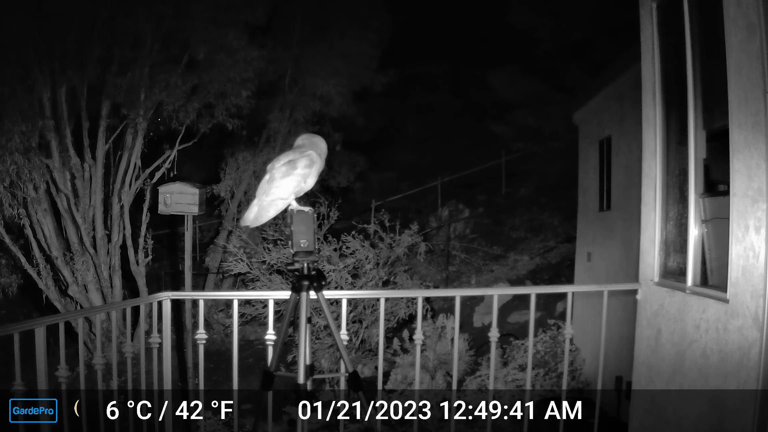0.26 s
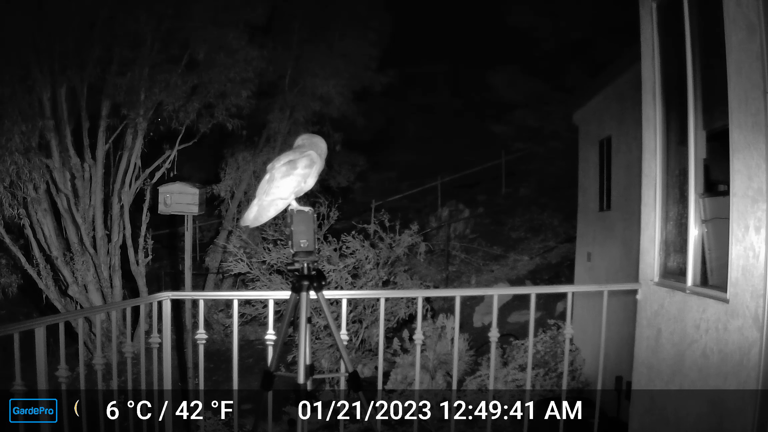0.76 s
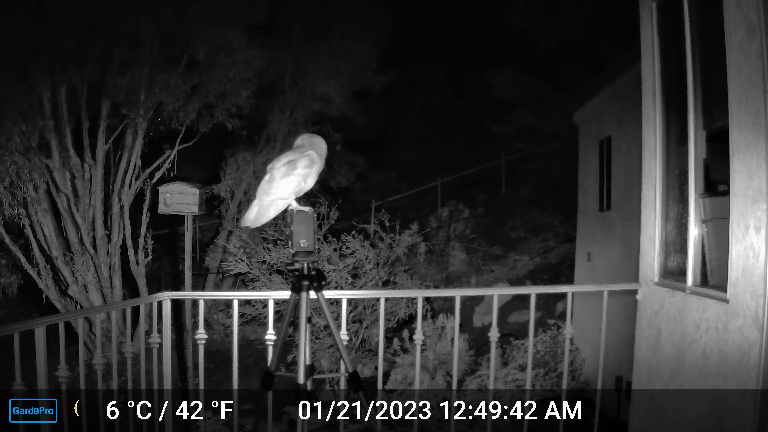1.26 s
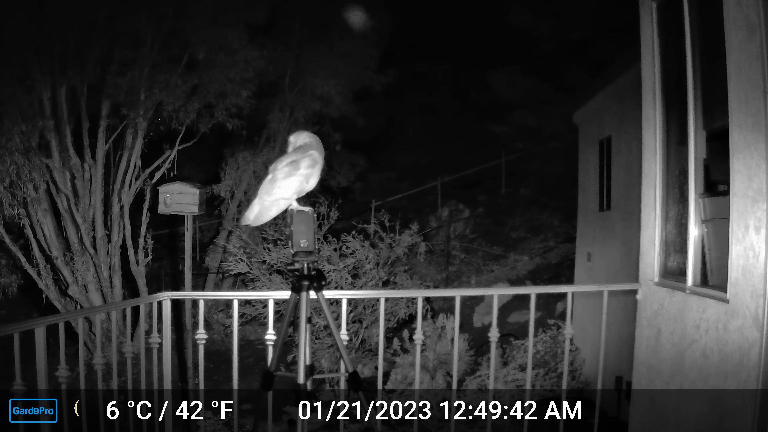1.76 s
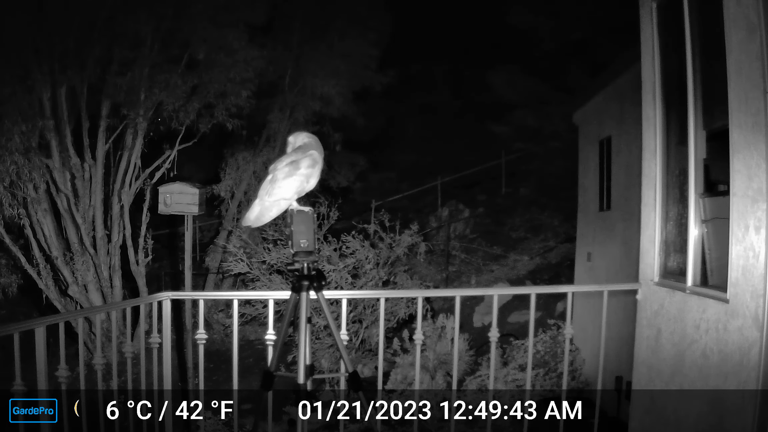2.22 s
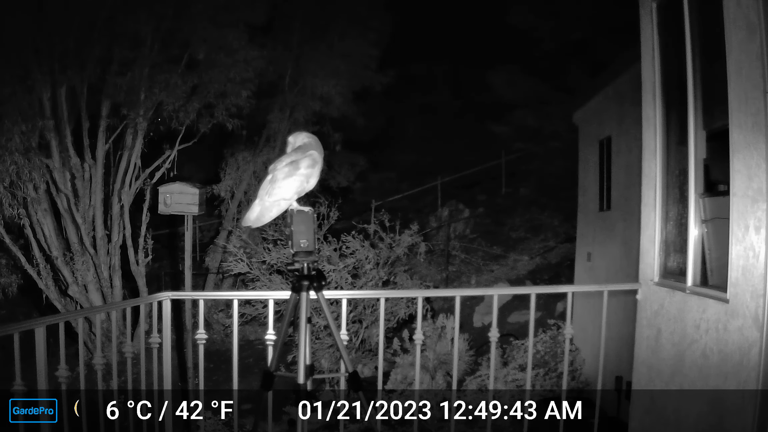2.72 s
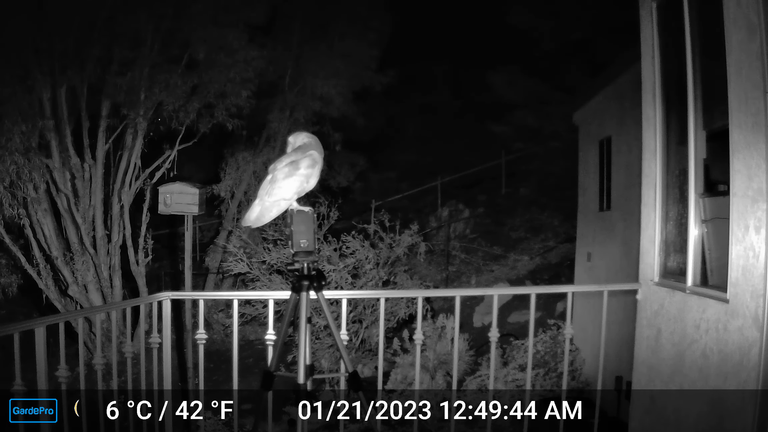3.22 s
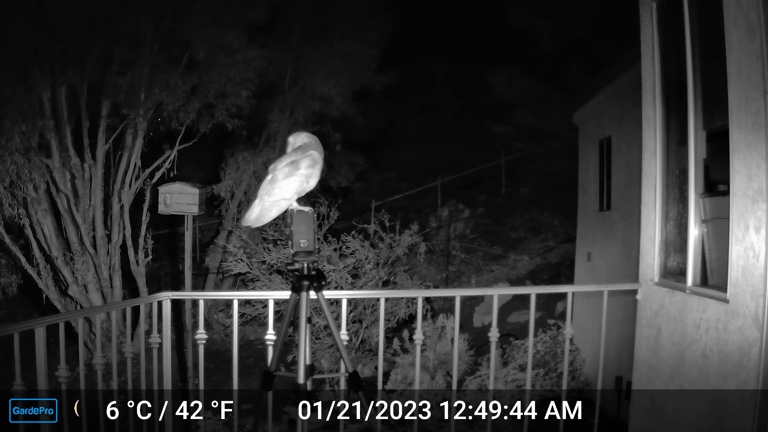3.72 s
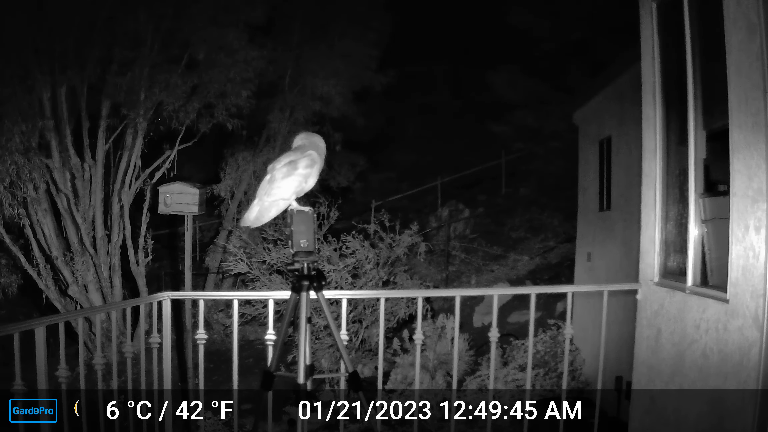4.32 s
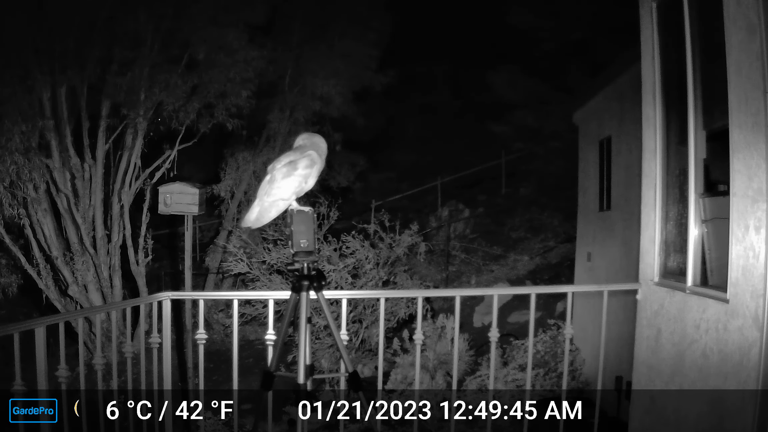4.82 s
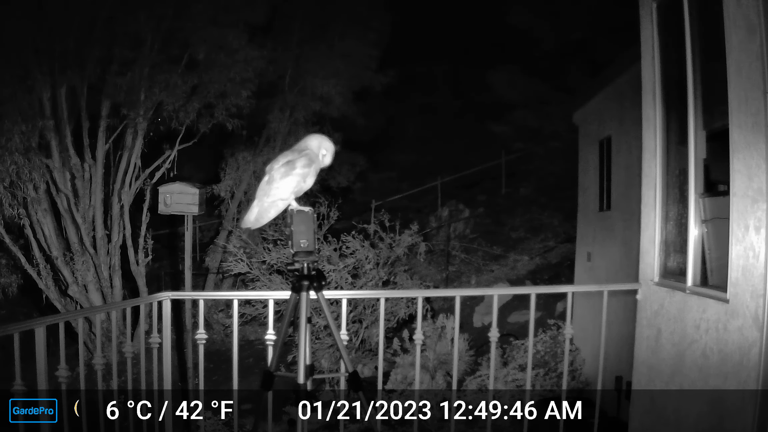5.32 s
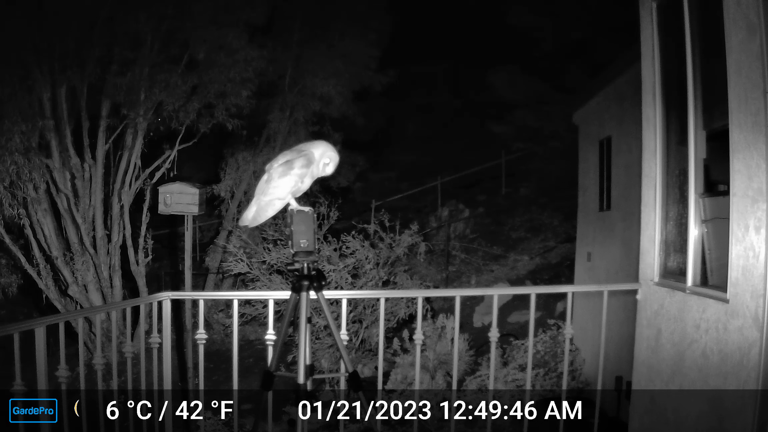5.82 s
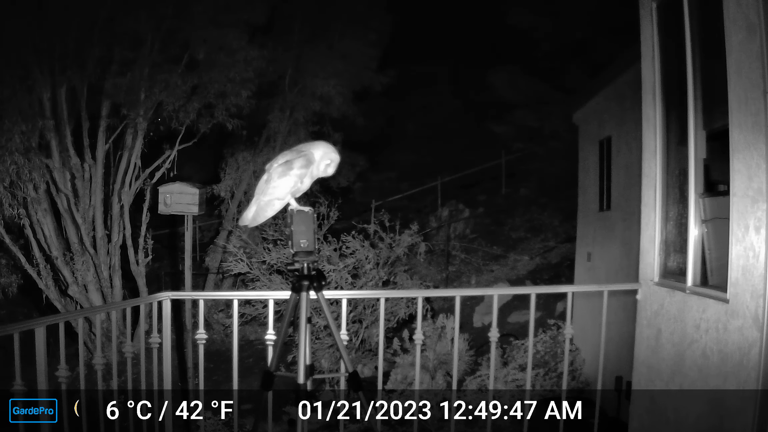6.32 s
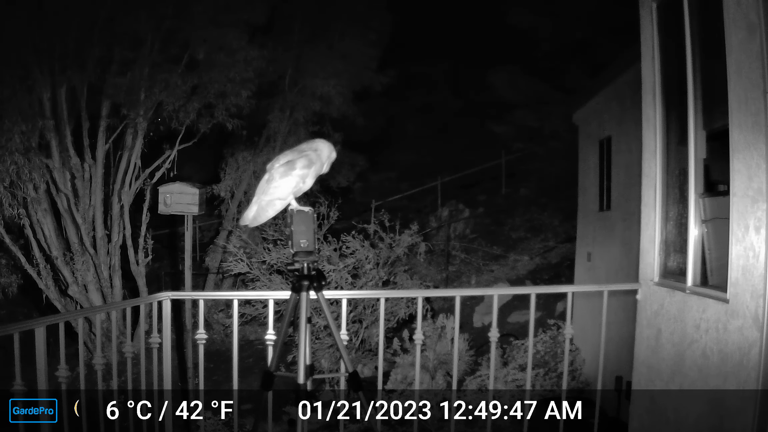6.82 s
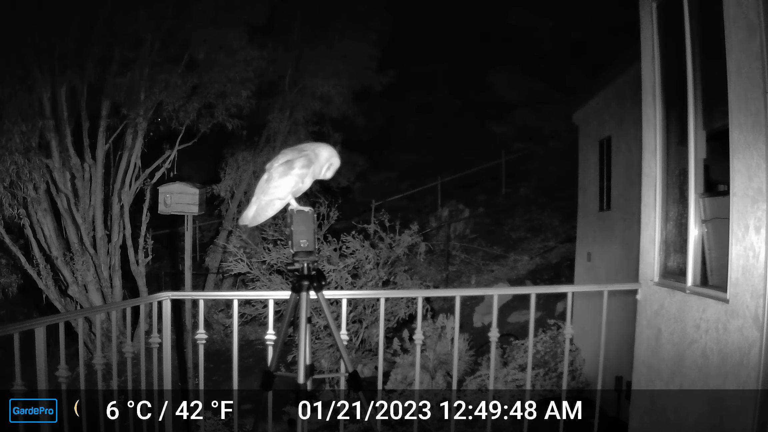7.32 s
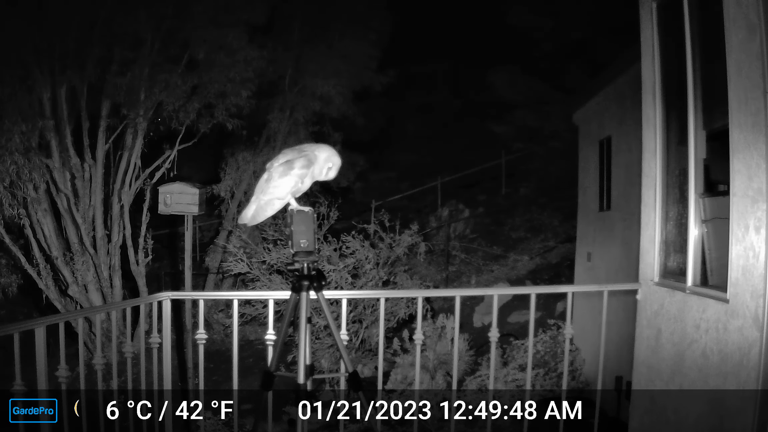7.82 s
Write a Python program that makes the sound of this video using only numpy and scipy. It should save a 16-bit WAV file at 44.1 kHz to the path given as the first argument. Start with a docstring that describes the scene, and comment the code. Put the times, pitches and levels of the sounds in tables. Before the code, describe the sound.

Quiet night air with a steady, far, low rumble. A tiny high pip and soft thump open the scene, with more dull thumps before 0.8 s. A nearby barn owl screeches at 0.4, 1.5, 2.4, 4.2, 5.3 and 6.5 s. Each lasts about 0.45 s: a throaty, fluttering rough tone scoops up, strengthens and opens into coarse hiss, then is sharply cut off. Small falling squeaks end the calls near 1.9, 2.8 and 7.0 s. Other pips come at 1.1 and 4.9 s. Very faint distant hoots sound around 1.8 to 2.3 s, with thumps near 1.9, 3.6, 3.9 and 7.4 s. Distant traffic drone swells after 4 s, strongest around 5.3 and 7.2 s, then fades. Light house reflections and a short tail surround the owl; the small outdoor microphone lacks the highest treble.

```python
"""Barn owl screeching at night

A barn owl by a house gives six rasping screeches: a rough tone and throat sound open into a hiss and are cut off.
One fluttering airflow drives a chaotic tone, throat resonances and beak turbulence; some calls end in gliding squeaks.
Three tiny pips and faint distant hoots are short sine glides. Reflections and a short tail surround owl and pips.
Behind lie a far rumble and traffic drone of resonant noise, and soft thumps that are low, falling glides.
A trail camera close by cuts off the top of the treble."""
import sys
import numpy as np
from scipy import signal
from scipy.fft import rfft, irfft
from scipy.io import wavfile
from scipy.ndimage import uniform_filter1d

SR = 44100
rng = np.random.default_rng(int(sys.argv[2]) if len(sys.argv) > 2 else 0)


def wrap_up_sound(samples):
    """Save the sound to the file named by the first command line argument, as 16-bit audio."""
    columns = np.atleast_2d(samples).T
    # keep every value between -1 and 1, then stretch to whole-number steps
    tamed = np.clip(columns, -1, 1)
    steps = np.round(tamed * 32767).astype(np.int16)
    wavfile.write(sys.argv[1], SR, steps)


N = 355446
TIME = np.arange(N) / SR
FREQS = np.maximum(np.fft.rfftfreq(N, 1 / SR), 1)

# the effort grows steadily through a screech and lifts the pitch and the levels of tone and throat
PITCH_RISE_HZ, TONE_SWELL_DB, THROAT_SWELL_DB = 169.7, 6.5, 2.5
# the hiss lies this far below its full level after its wait, and the gap then decays with this time constant
HISS_RISE_DB, HISS_RISE_S = 25, 0.073
# at the end the breath is cut: level and pitch fall ever faster, by these amounts at the nominal end
RELEASE_S, RELEASE_DB, PITCH_SAG_HZ = 0.056, 23, 140.8
# unsteadiness of the voice: corner rate and rms spreads
WAVER_HZ, PITCH_WAVER_HZ, TONE_WAVER_DB, THROAT_WAVER_DB = 11.5, 10, 0.5, 2.16
# the throat sounds first; the tone comes a moment later and scoops up to its pitch
THROAT_ATTACK_S, TONE_LAG_S, TONE_ATTACK_S = 0.036, 0.014, 0.038
SCOOP_HZ, SCOOP_S = 260, 0.06


def from_db(db):
    """Logarithmic level: decibels to amplitude gain."""
    return 10 ** (np.asarray(db) / 20)


def rms_one(x):
    """Power normalization: scale to unit mean square."""
    return x / np.sqrt(np.mean(np.abs(x) ** 2) + 1e-20)


def white():
    """White noise: equal expected power at all frequencies."""
    return rng.standard_normal(N)


def colour(x, gain):
    """Linear filtering: weight the spectrum by a gain, then set the rms to 1."""
    return rms_one(irfft(rfft(x) * gain, N))


def resonances(modes, widen):
    """Parallel resonators: the powers of steep-sided peaks add; table widths are multiplied by 0.77 and widen."""
    power = 0
    for hz, width, db in modes:
        detuning = (FREQS - hz) / (0.77 * width * widen)
        power = power + (from_db(db) / (1 + detuning ** 2)) ** 2
    return np.sqrt(power)


def wander(rate_hz):
    """Low-pass random fluctuation: motion mostly slower than rate_hz, with rms 1."""
    return colour(white(), 1 / (1 + (FREQS / rate_hz) ** 4))


def fade_in(age, seconds):
    """Smooth onset: a squared-sine rise from 0 to 1."""
    return np.sin(np.pi / 2 * np.clip(age / seconds, 0, 1)) ** 2


def steadied(x, seconds):
    """Level regulation: steady air pressure evens out slow lumps of power and leaves the fine grain."""
    return x / np.sqrt(uniform_filter1d(x ** 2, int(seconds * SR) + 1) + 1e-9)


def glides(rows, overtone_db, waver):
    """Frequency-swept oscillation: short notes with a second harmonic swell and fade as their pitch slides."""
    out, unsteady = np.zeros(N), 1 + waver * wander(160)
    for start, length, from_hz, to_hz, db in rows:
        now = (TIME >= start) & (TIME < start + length)
        part = (TIME[now] - start) / length
        pitch = (from_hz + (to_hz - from_hz) * part) * unsteady[now]
        phase = 2 * np.pi * np.cumsum(pitch) / SR
        note = np.sin(phase) + from_db(overtone_db) * np.sin(2 * phase)
        out[now] += np.sqrt(2) * from_db(db) * np.sin(np.pi * part) ** 2 * note
    return out


def owl():
    """Source-filter principle: one fluttering airflow drives the rough tone, the throat and the hiss."""
    # low resonances of the throat: (centre [Hz], width before scaling [Hz], relative level [dB])
    throat_modes = [(521, 210, -3.5), (1067, 120, 3.5), (1290, 100, -2.5)]
    pitch, tone_gain, throat_gain, hiss_gain = call_controls()
    gape = np.clip(hiss_gain / from_db(-41.5), 0, 1) ** 0.92      # harder blowing opens the beak

    flap_hz, jitter = 115, 0.3      # median flapping rate, rms spread of its natural logarithm
    cycles = np.cumsum(flap_hz * np.exp(jitter * wander(40.3))) / SR
    pulsing = flutter(cycles, depth_db=3.5, uneven_db=1.2)

    rough = rough_tone(pitch, pulsing, scatter_hz=48.0, noisy=0.37, low_hz=1340, high_hz=1970)
    tone = from_db(-0.1) * tone_gain * steadied(rough, seconds=0.029)

    undertone_hz = 1045
    undertone = rough_tone(undertone_hz, pulsing, scatter_hz=36.3, noisy=0.46, low_hz=914, high_hz=1173)
    throat_noise = colour(white(), resonances(throat_modes, widen=0.41))
    throat = throat_gain * (undertone + from_db(-4.5) * throat_noise)

    breath = beak_hiss(gape, restless_db=1.42, restless_hz=21.7)
    rasp = breath * flutter(cycles, depth_db=1.0, uneven_db=0.53)
    hiss = from_db(0.7) * hiss_gain * steadied(rasp, seconds=0.03)
    return tone + throat + hiss + slides_and_squeaks()


def call_controls():
    """Breath control: one screech follows another, and slow wavers unsettle pitch, tone and throat."""
    # screeches: (start [s], length [s], pitch at the crest [Hz], nominal tone level [dB],
    # nominal throat level [dB], nominal hiss level [dB], wait before the hiss [s])
    screeches = [ (0.385, 0.43, 1732, -42.2, -52, -41, 0.059),
                 (1.462, 0.45, 1694, -42.2, -52, -42.5, 0.053),
                 (2.39, 0.45, 1742, -41.5, -51.5, -39, 0.062), (4.189, 0.44, 1762, -43.5, -56, -40, 0.072),
                 (5.330, 0.445, 1737, -43.5, -54, -42.5, 0.042),
                 (6.541, 0.46, 1769, -43, -53, -40.5, 0.049), ]
    controls = screech(*screeches[0])
    for row in screeches[1:]:
        controls = np.where(TIME >= row[0], screech(*row), controls)
    pitch, tone, throat, hiss = controls
    pitch = pitch + PITCH_WAVER_HZ * wander(WAVER_HZ)
    tone = tone * from_db(TONE_WAVER_DB * wander(WAVER_HZ))
    throat = throat * from_db(THROAT_WAVER_DB * wander(WAVER_HZ))
    return pitch, tone, throat, hiss


def screech(start, length, crest_hz, tone_db, throat_db, hiss_db, wait):
    """Pressure-driven phonation: effort lifts pitch, tone and throat; the hiss builds up; all are cut off."""
    age = np.clip(TIME - start, 0, 2 * length)
    effort = np.minimum(age / (length - RELEASE_S), 1)
    closing = np.maximum((age - length) / RELEASE_S + 1, 0) ** 2
    scoop = SCOOP_HZ * (1 - fade_in(age, SCOOP_S))
    pitch = crest_hz - scoop - PITCH_RISE_HZ * (1 - effort) - PITCH_SAG_HZ * np.minimum(closing, 1)
    tone = fade_in(age - TONE_LAG_S, TONE_ATTACK_S) * from_db(tone_db - TONE_SWELL_DB * (1 - effort))
    throat = fade_in(age, THROAT_ATTACK_S) * from_db(throat_db - THROAT_SWELL_DB * (1 - effort))
    hiss_deficit_db = HISS_RISE_DB * np.exp((wait - age) / HISS_RISE_S)
    hiss = fade_in(age, THROAT_ATTACK_S) * from_db(hiss_db - hiss_deficit_db)
    release = from_db(-RELEASE_DB * np.minimum(closing, 10))
    return np.array([pitch, tone * release, throat * release, hiss * release])


def flutter(cycles, depth_db, uneven_db):
    """Amplitude modulation: the membranes of the syrinx flap unevenly and pulse the airflow."""
    return rms_one(from_db(depth_db * np.sin(2 * np.pi * cycles) + uneven_db * wander(60)))


def rough_tone(pitch, pulsing, scatter_hz, noisy, low_hz, high_hz):
    """Irregular oscillation: random frequency and amplitude modulation, confined by a windpipe resonance."""
    phase = 2 * np.pi * np.cumsum(pitch + scatter_hz * wander(176)) / SR
    swirl = wander(160) * np.cos(phase) + wander(190) * np.sin(phase)
    windpipe = signal.butter(2, [low_hz, high_hz], "band", fs=SR, output="sos")
    return rms_one(signal.sosfiltfilt(windpipe, pulsing * (np.sin(phase) + noisy * swirl)))


def beak_hiss(gape, restless_db, restless_hz):
    """Turbulence through a variable resonator: the gape shifts the balance of bands that each swell and sink."""
    # beak resonances: (centre [Hz], width before scaling [Hz], relative level wide open [dB],
    # relative level nearly shut [dB])
    beak_modes = [(1510, 81, 3, 6), (1806, 150, 2, -7), (2138, 250, -3.5, -2), (2308, 100, 2.5, -3),
                  (2740, 150, -1.5, 2.5), (3130, 250, -2.5, 5), (3390, 230, 1.5, -4),
                  (3745, 310, -4, -15.5), (4043, 460, -3.5, -5.5), (4650, 680, -3.5, -4),
                  (5130, 460, -1, -22.5), (5560, 270, 1.5, 1), (5955, 160, -0.5, 3.5), (6150, 99, 1.5, 4),
                  (6450, 200, -0.5, 1.5), (6850, 400, -7.5, -2.5), (7370, 200, -11, -9),
                  (7670, 230, -11.5, -10), (8250, 410, -23.5, -21.5)]
    # fixed narrow dips in the hiss, the same in all calls: (centre [Hz], width [Hz])
    dips = [(2490, 80), (3580, 42), (5300, 38)]
    dip_gain = np.prod([np.abs(FREQS - hz) / np.hypot(FREQS - hz, width) for hz, width in dips], axis=0)
    air = rfft(turbulence(snaps_per_s=1500, snap_share=0.89)) * dip_gain
    out, power = 0, 0
    for k, (hz, width, open_db, shut_db) in enumerate(beak_modes):
        response = resonances([(hz, width, 0)], widen=0.67)
        band = irfft(air * response * 1j ** k, N)      # neighbours ring a quarter cycle apart
        gain = from_db(shut_db + gape * (open_db - shut_db))
        out = out + band * gain * from_db(restless_db * wander(restless_hz))
        power = power + np.var(band) * gain ** 2
    return rms_one(out / np.sqrt(power))


def turbulence(snaps_per_s, snap_share):
    """Turbulent noise: rushing air and tiny irregular snaps share the power."""
    snaps = (rng.random(N) < snaps_per_s / SR) * rng.choice([-1, 1], N)
    return np.sqrt(1 - snap_share) * white() + np.sqrt(snap_share) * rms_one(snaps)


def slides_and_squeaks():
    """Register break: the voice slides down brightly and squeaks at the end of some calls."""
    # bright slides: (start [s], length [s], start pitch [Hz], end pitch [Hz], crest level of the fundamental [dB])
    slides = [(2.810, 0.04, 1663, 1085, -51.5), (6.974, 0.052, 1410, 1110, -62)]
    # squeaks, two of them followed by a fainter, level-pitched echo:
    # (start [s], length [s], start pitch [Hz], end pitch [Hz], crest level of the fundamental [dB])
    squeaks = [(1.895, 0.026, 1587, 1400, -48), (2.832, 0.025, 1170, 1010, -44),
               (2.848, 0.026, 1085, 1090, -56), (6.996, 0.027, 1150, 1014, -43.5),
               (7.016, 0.021, 1100, 1100, -55)]
    return glides(slides, overtone_db=0.5, waver=0.025) + glides(squeaks, overtone_db=-11.5, waver=0.026)


def pips():
    """Brief tone bursts: tiny, nearly pure pips close by."""
    # pips: (start [s], length [s], start pitch [Hz], end pitch [Hz], crest level before reflections [dB])
    pip_rows = [(0.012, 0.024, 2880, 2760, -57), (1.122, 0.022, 2870, 2900, -57.5),
                (4.852, 0.027, 2240, 2400, -51.5)]
    return glides(pip_rows, overtone_db=-30, waver=0.028)


def garden(x):
    """Reflection and scattering: delayed copies and a faint decaying tail from the shrubs join the direct sound."""
    # reflections from the house and, later, from the trees: (delay [s], level relative to direct sound [dB])
    echoes = [(0.009, -13), (0.105, -32)]
    t60_s = 0.26
    t = TIME[:SR // 2]
    tail = signal.sosfilt(signal.butter(1, 2500, fs=SR, output="sos"), rng.standard_normal(len(t)))
    tail *= from_db(-60 * t / t60_s) * (t > 0.012)
    response = from_db(-23.5) * tail / np.sqrt(np.sum(tail ** 2))
    for delay, db in echoes:
        response[int(delay * SR)] += from_db(db)
    return x + signal.fftconvolve(x, response)[:N]


def hoots():
    """Nearly sinusoidal phonation: faint far hoots with a weak second harmonic."""
    # hoots: (start [s], length [s], start pitch [Hz], end pitch [Hz], crest level of the fundamental [dB])
    hoot_rows = [(1.83, 0.085, 488, 479, -56), (2.06, 0.16, 328, 339, -58.5), (2.18, 0.14, 335, 330, -58),
                 (2.20, 0.13, 411, 412, -60)]
    return glides(hoot_rows, overtone_db=-30, waver=0.01)


def thumps():
    """Low-frequency tone bursts: soft thumps heard as short falling tones."""
    # thumps: (start [s], length [s], start pitch [Hz], end pitch [Hz], crest level of the fundamental [dB])
    thump_rows = [(0.0, 0.056, 100.5, 91, -43.5), (0.37, 0.055, 105, 90, -43.5),
                  (0.70, 0.051, 111, 96, -47), (1.822, 0.041, 85.5, 78, -40.5),
                  (1.928, 0.026, 118, 110, -37.5), (1.955, 0.042, 139, 116, -42.5),
                  (3.585, 0.031, 117, 104, -42.5), (3.862, 0.038, 128, 115, -43.5),
                  (7.432, 0.053, 109, 103.6, -43.5)]
    return glides(thump_rows, overtone_db=-22.0, waver=0.056)


def traffic():
    """Resonant noise: the drone of distant traffic swells and sinks."""
    # swells: (time [s], level [dB])
    swells = [(0, -86), (2.0, -77.5), (4.2, -73.5), (5.25, -63.5), (5.8, -67.5), (7.2, -64.5), (8.06, -83)]
    # resonances of the drone: (centre [Hz], width before scaling [Hz], relative level [dB])
    drone_modes = [(255, 52, 0.5), (338.5, 33, -2), (424, 20, -4)]
    drone = colour(white(), resonances(drone_modes, widen=0.42))
    return from_db(np.interp(TIME, *np.transpose(swells))) * drone


def rumble():
    """Shaped noise: steady night air with a far rumble whose low resonances surge at random."""
    # spectrum of the night air: (frequency [Hz], relative spectral density level [dB])
    air_spectrum = [(15, -23.5), (35, -5.5), (65, -1.5), (115, -1), (175, -4.5), (260, -15), (400, -15),
                    (700, -17), (1300, -24), (2300, -27), (4000, -31), (7300, -37.5), (8100, -47.5),
                    (8900, -64)]
    # resonances in which the rumble booms: (centre [Hz], width before scaling [Hz], relative level [dB])
    boom_modes = [(85, 25, -4), (115.6, 23, 0), (206.8, 28.7, -2.5)]
    hz, db = np.transpose(air_spectrum)
    air_gain = from_db(np.interp(np.log(FREQS), np.log(hz), db))
    air = from_db(-51 - 1.9) * colour(white(), air_gain)
    boom = from_db(-58.5) * colour(white(), resonances(boom_modes, widen=0.47))
    return air + boom * from_db(2.2 * wander(5.9))


def scene():
    """Superposition: owl and pips with their reflections, then hoots, thumps, traffic and rumble."""
    near = garden(owl() + pips())
    return (near + hoots() + thumps() + traffic() + rumble())[None]


def record(dry):
    """Band limitation: the camera's steep low-pass cuts off the top of the treble."""
    cutoff_hz = 8900
    return signal.sosfilt(signal.ellip(10, 0.2, 70, cutoff_hz, fs=SR, output="sos"), dry)


dry = scene()
out = record(dry)
wrap_up_sound(out)
```